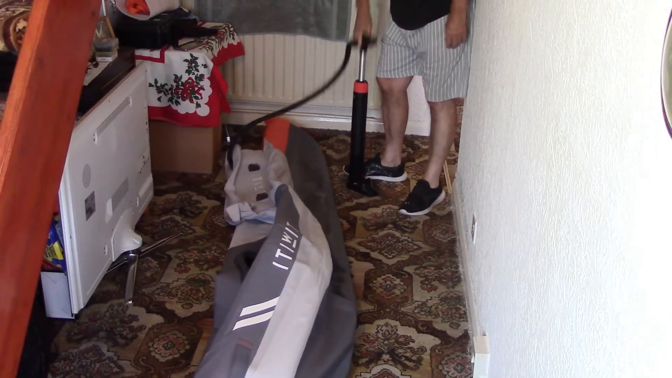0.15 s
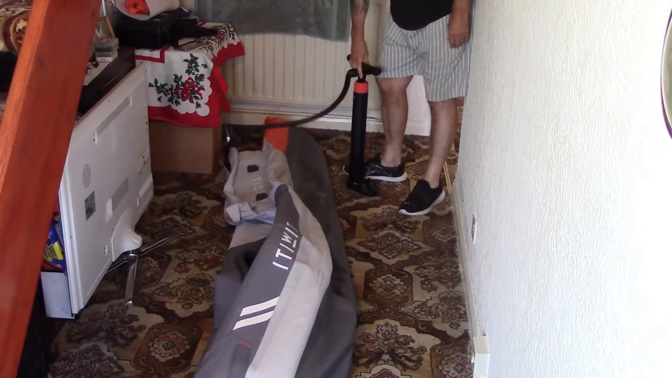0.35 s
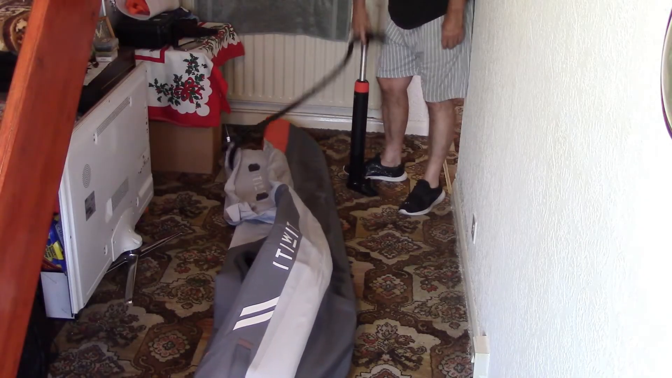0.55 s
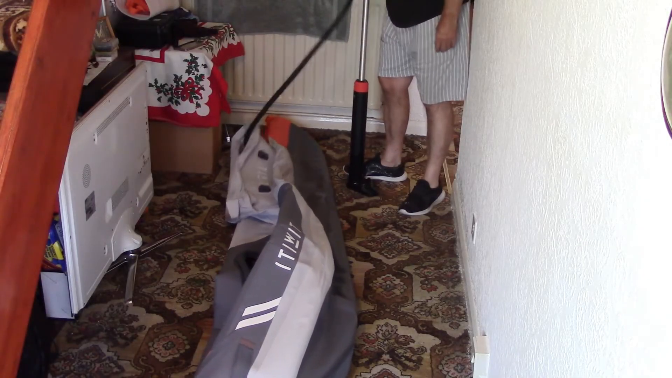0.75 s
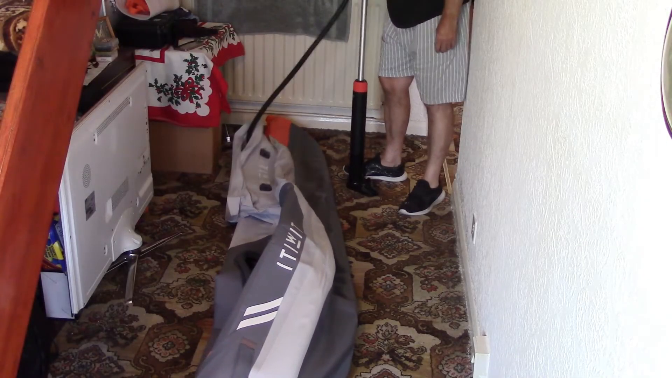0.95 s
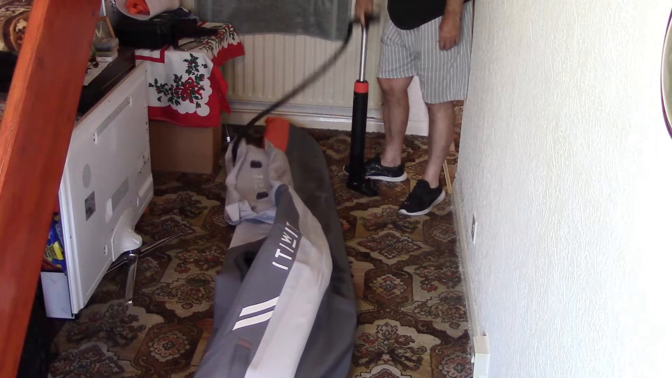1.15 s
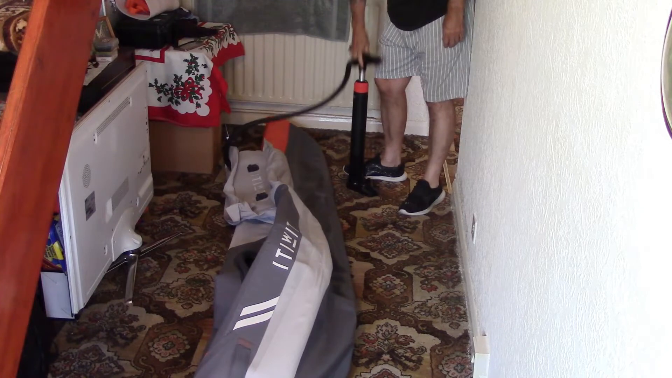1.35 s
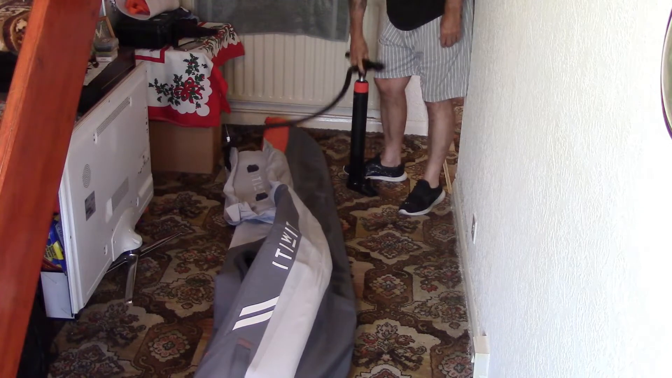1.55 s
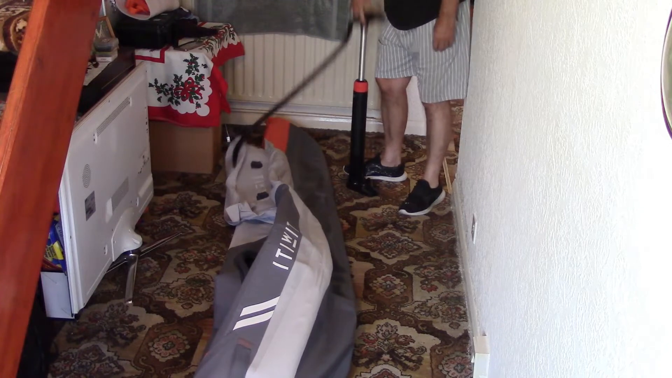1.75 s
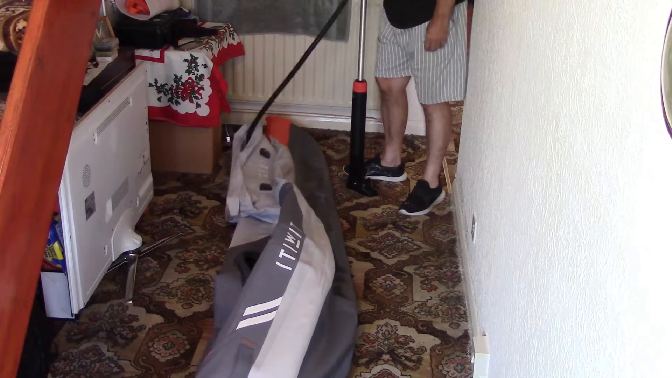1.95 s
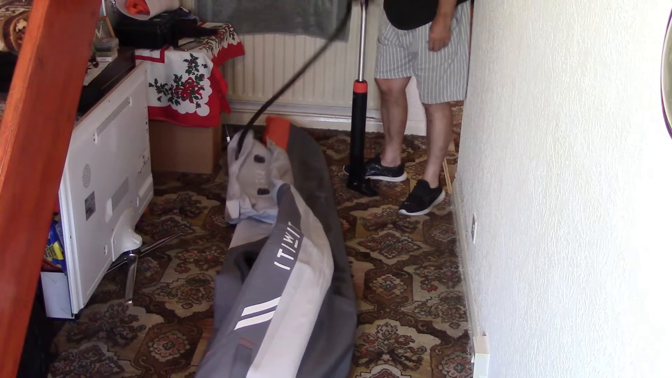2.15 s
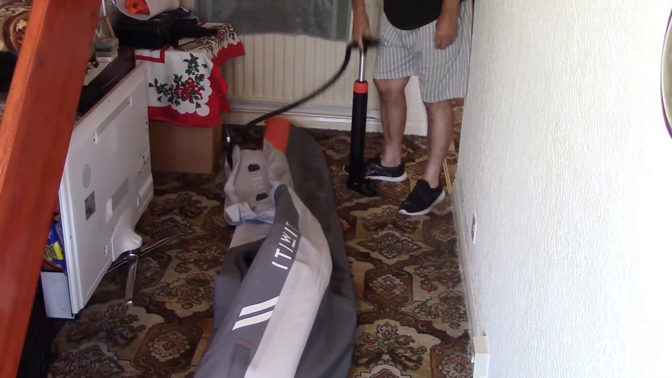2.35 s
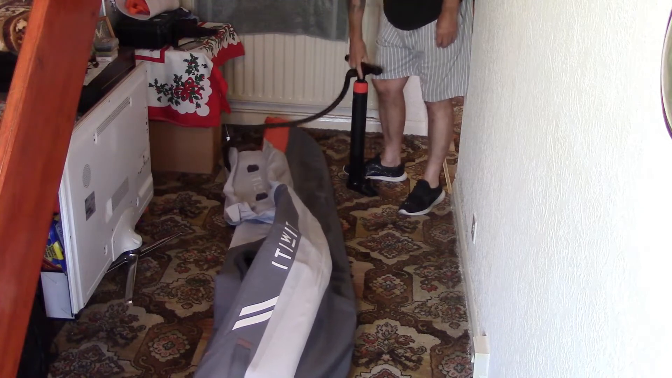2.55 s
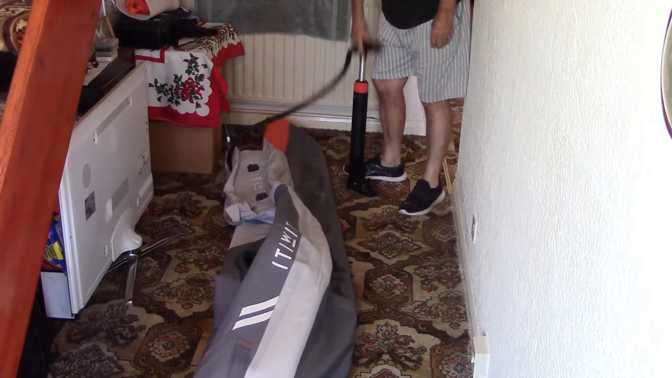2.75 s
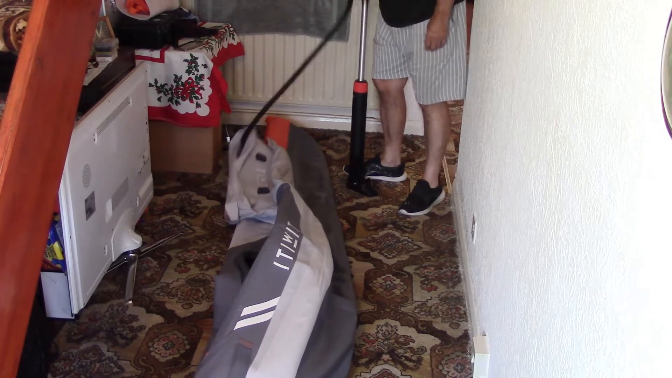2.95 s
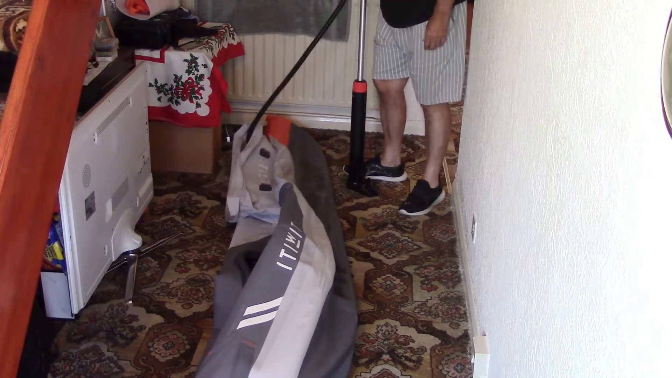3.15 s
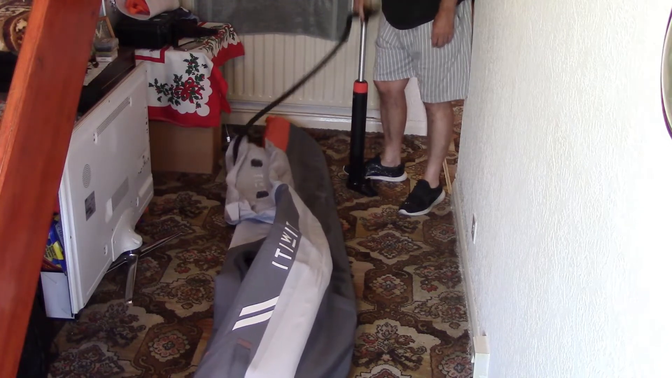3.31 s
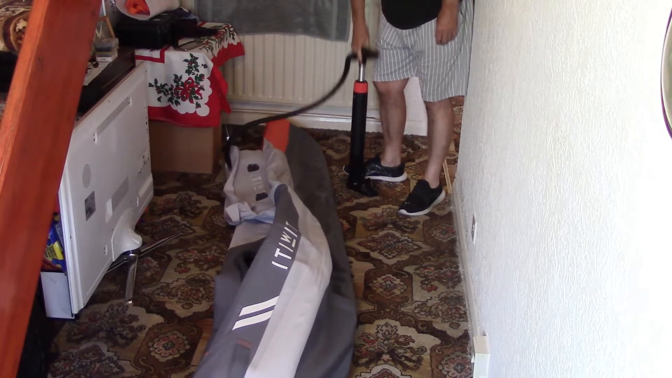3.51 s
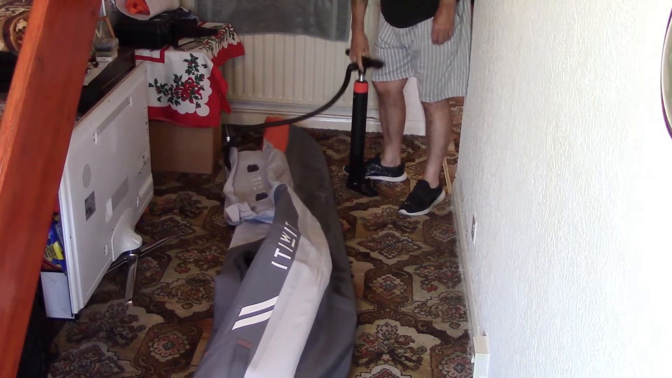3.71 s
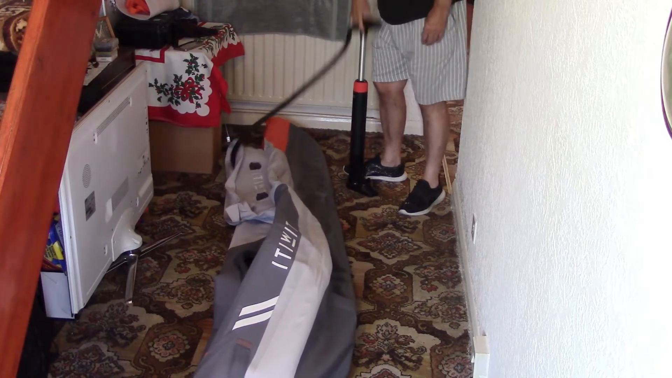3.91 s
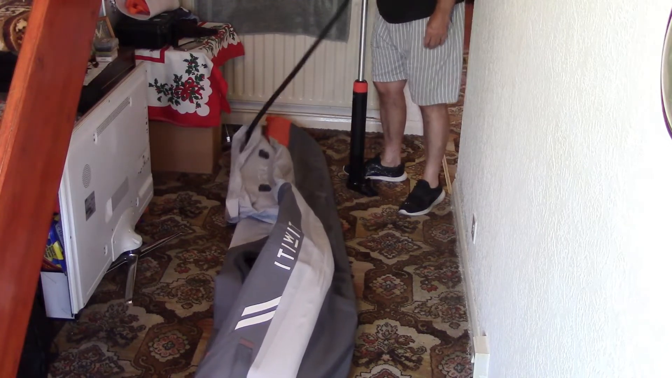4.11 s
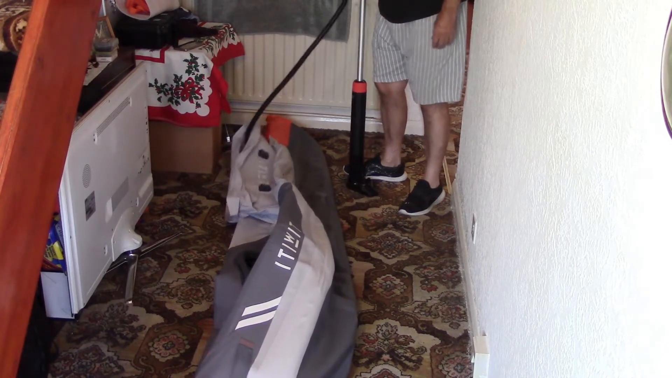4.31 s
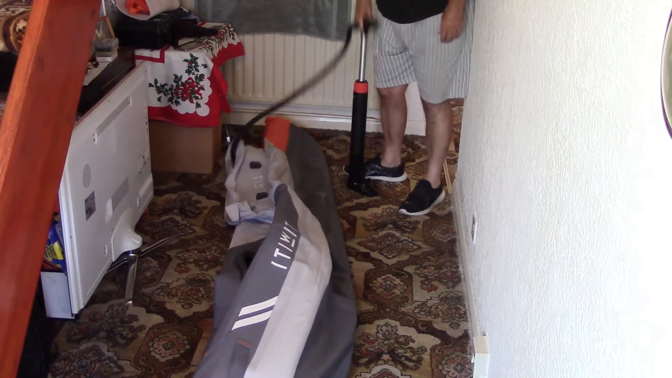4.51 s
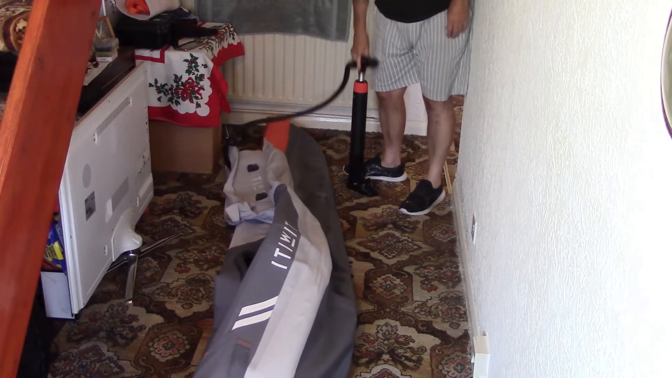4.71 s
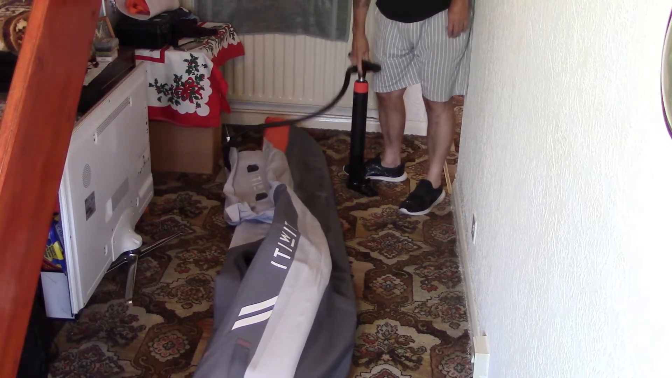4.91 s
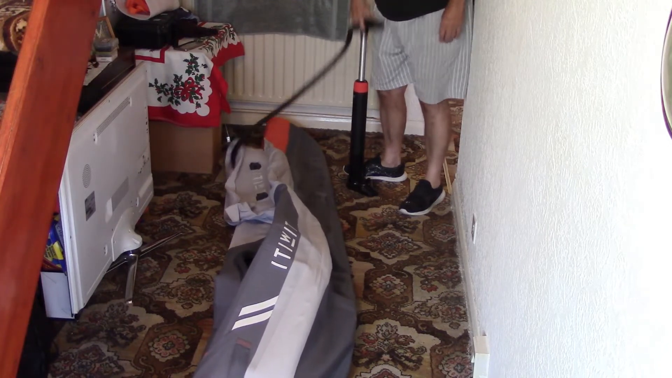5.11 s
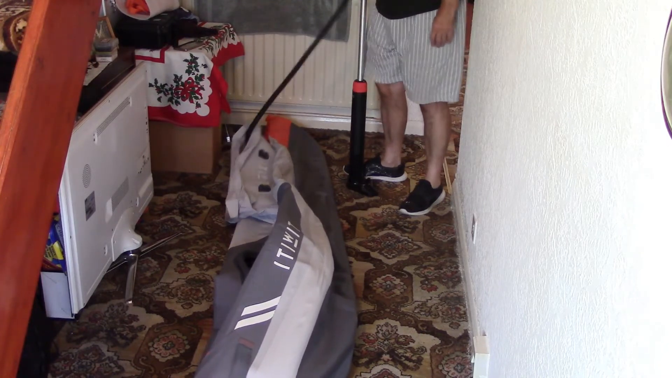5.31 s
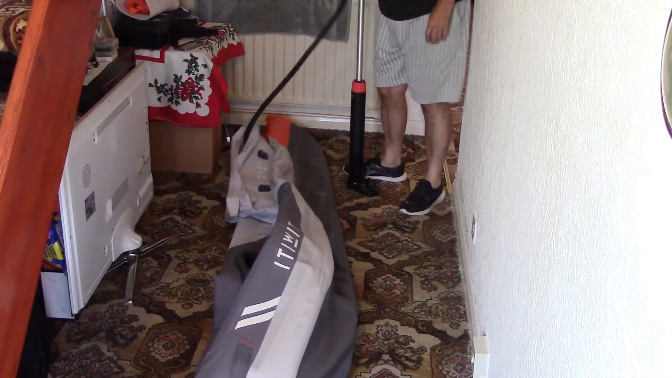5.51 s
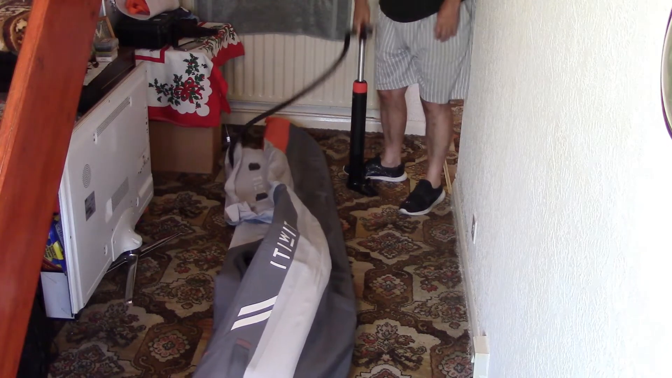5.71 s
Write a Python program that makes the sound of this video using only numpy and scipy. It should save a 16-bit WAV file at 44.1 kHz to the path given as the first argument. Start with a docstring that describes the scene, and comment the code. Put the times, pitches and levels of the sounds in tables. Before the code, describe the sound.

A stand-up pump works without pause in a narrow carpeted room. The sound begins mid-push, then pulls and pushes alternate to the end. Pushes give a longer hissing rush that weakens and wavers; pulls give a rougher, raspier draw of air, often stopped by a hard clunk with clatter and a tick. Small bumps, hose slaps and thin whistles fall between. Faint steady room noise lies underneath, and the small microphone distorts on the hardest knocks.

```python
"""A small microphone in a narrow carpeted room, while a double-action hand pump is worked.
The take opens within a push; pull and push then alternate to its end, eleven strokes in all. Air, made of
shaped noise, rushes, rasps and hisses both ways, with brief whistles. Most strokes end in a knock of the
piston, short sine bursts with clatter and tick, hardest at the top, where it overloads the input.
After each knock the room rings on its low modes and the far walls answer 33 and 41 ms later."""
import sys
import numpy as np
from scipy import signal
from scipy.fft import rfft, irfft
from scipy.io import wavfile
from scipy.ndimage import uniform_filter1d

SR = 44100
rng = np.random.default_rng(int(sys.argv[2]) if len(sys.argv) > 2 else 0)


def put_to_file(sound):
    """Save the sound as 16-bit audio at rate SR, in the file named by the first command-line argument."""
    columns = np.atleast_2d(sound).T  # one column per channel
    safe = np.clip(columns, -1, 1)
    whole_steps = np.round(safe * 32767)
    wavfile.write(sys.argv[1], SR, whole_steps.astype(np.int16))


N = 258514  # length in samples
HOP = 128  # samples between short-time noise spectra

# Strokes of the pump, push and pull in turn. Each row: start in seconds, valve opens in seconds,
# fastest in seconds, stop in seconds, rush level in dB, rasp level in dB, hiss level in dB,
# slowing toward the stop in dB.
STROKES = [(-.25, -.24, 0.053, .27, -28.5, -33.5, -33, -11), (.35, .37, 0.58, 0.78, -28, -29, -39, -4),
           (.845, .85, 1.2, 1.392, -29.5, -33.5, -34.5, -14.5),
           (1.475, 1.52, 1.744, 1.906, -27.5, -29.5, -37.5, -6),
           (1.96, 1.965, 2.144, 2.6, -28.5, -35, -36, -12), (2.58, 2.62, 2.88, 3.017, -28, -29, -39, -6.5),
           (3.07, 3.075, 3.36, 3.745, -30, -35.5, -36.5, -23.5),
           (3.7, 3.73, 3.93, 4.14, -27.5, -30, -39.5, -4),
           (4.24, 4.245, 4.5, 4.79, -30.5, -36.5, -36, -9.5), (4.86, 4.94, 5.04, 5.35, -29, -30, -38.5, -4),
           (5.43, 5.435, 5.69, 5.866, -28.5, -32.5, -34.5, -8)]
# How rush, rasp and hiss (one row each) follow a push or a pull. Each row: delay in seconds,
# rise time constant in seconds, level at the start relative to full speed in dB,
# share of the slowing as a factor, lateness of the slowing as an exponent, release in dB per second.
PUSH_LAWS = [(0.016, 0.032, 1, 1.4, 3.06, -400), (.005, .02, -23, 1.3, 1.75, -280),
             (.001, 0.0087, -6.5, 1.42, 1.4, -500)]
PULL_LAWS = [(0.01, 0.045, 1, .3, 1.3, -350), (0.0089, 0.068, -8.5, 1.9, 1.6, -300),
             (.001, 0.032, -2.5, .9, 1.6, -600)]
# Colours of the air, with the rush different each way. Each row: frequency in Hz, relative density in dB per Hz.
RUSH_PUSH = [(60, -26), (170, -20.5), (350, -2), (475, 0.5), (546, -13), (690, 3.5), (830, -3), (1000, 1),
             (1700, -1.5), (2300, -17.5), (4000, -43)]
RUSH_PULL = [(60, -70), (200, -32), (360, -5), (475, -8), (525, -12), (600, 0.5), (1000, -1.5), (1240, 4),
             (1900, -4), (2400, -8.5), (4000, -37)]
RASP = [(1200, -47), (1900, 2.5), (2400, 0.5), (3400, 2.5), (5000, -3.5), (6900, -11), (9000, -13.5),
        (15500, -40)]
# The valve duct passes its first cross mode only above a sharp cut-on, fainter on the pull.
# Each row: frequency in Hz, relative density in dB per Hz.
HISS_PUSH = [(6000, -11.5), (7150, -12.5), (7350, 2), (7800, -2.5), (8600, -2), (10000, -13), (12600, -19),
             (14500, -34), (15600, -44)]
HISS_PULL = [(6000, -13.5), (7150, -5), (7350, 5), (7800, 0.5), (8600, -2), (10000, -10), (12600, -14.5),
             (14500, -34), (15600, -44)]
# Brief wavers of the flow. Each row: centre in seconds, half width in seconds,
# change of rush in dB, change of rasp in dB, change of hiss in dB.
WAVERS = [(.11, 0.041, -11, -4, -6.5), (.185, 0.05, 3.5, 4, -1.5), (.255, .015, -3, -2, -9),
          (1.07, .03, -4, -6.5, -2.5), (1.2, 0.039, -6.5, -2.5, -4.5), (1.34, .03, -4.5, -3, -1),
          (2.33, 0.047, -5, -3.5, 0), (2.445, 0.014, -10, -8, -5), (2.555, 0.038, -3, -3, -14.5),
          (3.55, 0.034, 1.5, -3, 0.5), (3.61, 0.026, -7, -16, 8.5), (3.67, 0.022, -15, -6, 11),
          (4.65, 0.025, -7, -4, -3), (4.735, 0.022, -10, -8, -8), (4.8, 0.029, 16, 5, 0),
          (4.94, 0.044, -4, -7, -5), (5.11, 0.027, 0, -2.5, -8), (5.17, .03, -2.5, -7.5, -.5),
          (5.58, .03, -2, -5, -1.5)]
# near full speed the hiss brightens: dB per octave above the cut-on, half width in s, cut-on in Hz
BRIGHTEN_DB, BRIGHTEN_S, CUT_ON_HZ = 2.5, 0.085, 7150


def flow_power(t, hz):
    """Mean power of the turbulence, bins x frames: rush, rasp and hiss of all strokes add as powers."""
    power = 0
    changes_db = sum(np.outer(db, np.exp(-((t - at) / width) ** 2)) for at, width, *db in WAVERS)
    rush_waver, rasp_waver, hiss_waver = gain_of(changes_db)
    octaves = np.log2(np.maximum(hz / CUT_ON_HZ, 1))
    for k, stroke in enumerate(STROKES):
        pulling = k % 2 == 1
        laws = PULL_LAWS if pulling else PUSH_LAWS
        rush = RUSH_PULL if pulling else RUSH_PUSH
        hiss = HISS_PULL if pulling else HISS_PUSH
        start, valve, fastest = stroke[:3]
        near_full_speed = np.exp(-((t - fastest) / BRIGHTEN_S) ** 2)
        bright = gain_of(BRIGHTEN_DB * np.outer(octaves, near_full_speed))
        # the hiss waits for the valve
        layers = [(rush, start, rush_waver), (RASP, start, rasp_waver), (hiss, valve, hiss_waver * bright)]
        for level_db, law, (points, opens, waver) in zip(stroke[4:], laws, layers):
            magnitude = waver * follow(t, opens, stroke, level_db, law) * colour(points, hz)
            power = power + magnitude ** 2
    return power


def follow(t, opens, stroke, level_db, law):
    """Gain of one layer: it opens, swells to full speed, sinks as the piston slows, and dies after the stop."""
    start, _, fastest, stop, *_, slowing_db = stroke
    delay, rise, early_db, share, lateness, release = law
    opened = (1 - np.exp(-np.maximum(t - opens - delay, 0) / rise)) ** 2
    early = np.clip((fastest - t) / (fastest - start), 0, 1) ** 2
    late = np.clip((t - fastest) / (stop - fastest), 0, 1) ** lateness
    after_stop = np.maximum(t - stop, 0)
    return opened * gain_of(level_db + early_db * early + share * slowing_db * late + release * after_stop)


# Jumps of the flow when a fold of the fabric opens. Each row: time in seconds, jump in dB,
# decay time constant in seconds.
SURGES = [(1.086, 8.5, 0.016), (2.19, 3.5, 0.018), (2.875, 2, .04), (4.489, 3.5, 0.027),
          (5.209, 0.5, 0.037)]


def air(patchy_db=1.5, flicker_db=0.78, streak_db=2.0):
    """Turbulence of the pump, its noise randomly uneven: patches, thin streaks, a flicker all frequencies share."""
    t = np.arange(N // HOP + 5) * HOP / SR
    hz = np.fft.rfftfreq(4 * HOP, 1 / SR)
    power = flow_power(t, hz)
    bins_by_frames = power.shape
    patches = uniform_filter1d(rng.standard_normal(bins_by_frames), size=5, axis=0)
    patches = evened(uniform_filter1d(patches, size=12, axis=1))
    flicker = evened(uniform_filter1d(rng.standard_normal(len(t)), size=4))
    streaks = evened(uniform_filter1d(rng.standard_normal(bins_by_frames), size=24, axis=1))
    surge_db = sum(db * (t > at) * np.exp(-abs(t - at) / decay) for at, db, decay in SURGES)
    uneven_db = surge_db + patchy_db * patches + flicker_db * flicker + streak_db * streaks
    return noise_from(np.sqrt(power) * gain_of(uneven_db))


# Brief whistles of seal and valve. Each row: start in seconds, length in seconds,
# frequency in Hz, level in dB before the swell.
WHISTLES = [(.14, 0.058, 1583, -30), (0.37, 0.013, 2150, -37), (0.393, .04, 3080, -44),
            (0.528, 0.015, 1330, -21), (0.612, .055, 6800, -37), (1.505, 0.037, 3050, -47),
            (1.637, .025, 5270, -33), (1.76, .02, 6500, -36), (2.616, 0.086, 3050, -39),
            (2.682, 0.067, 3380, -36), (2.77, .03, 5950, -37), (2.788, 0.047, 6270, -38),
            (3.69, .016, 2160, -44), (3.948, .045, 5200, -36), (4.04, 0.044, 1235, -27),
            (5.132, 0.033, 6000, -35), (5.172, .032, 5860, -41), (5.194, .039, 6300, -36)]
WHISTLE_Q = 48


def whistles():
    """Noise through a narrow resonance, under a short swell."""
    out = np.zeros(N)
    t = np.arange(round(.12 * SR)) / SR
    for s, length, hz, db in WHISTLES:
        pole = np.exp(-np.pi * hz / WHISTLE_Q / SR)
        complex_noise = rng.standard_normal((len(t), 2)) @ [1, 1j]
        slow = signal.lfilter([1], [1, -pole], complex_noise)
        tone = evened((slow * np.exp(2j * np.pi * hz * t)).real)  # slow noise shifted up to pitch
        swell = np.sin(np.pi * np.clip(t / length, 0, 1))
        add(out, s, gain_of(db) * swell * tone)
    return out


# Colour of the bright tick. Each row: frequency in Hz, relative density in dB per Hz.
TICK = [(500, 0.5), (1000, 0), (2100, -16), (3500, -2), (4800, -3), (6000, -16), (12000, -25), (15000, -45)]
FLOOR_HZ = 119


def knocks():
    """A soft thud, the barrel's longer rebound, a clatter of loose parts, a push on the floor and a bright tick."""
    thuds, ticks = np.zeros(N), np.zeros(N)
    t = np.arange(round(.08 * SR)) / SR
    hz = np.fft.rfftfreq(len(t), 1 / SR)
    clatter_colour = hz ** 2 / (1 + (hz / 670.0) ** 5)
    tick_colour = gain_of(read(TICK, hz))
    for row in blows_struck():
        s, db, thud_hz, ms, rebound_hz, rebound_db, clatter_db, tick_db, tick_ms, floor_db = row
        clatter_noise, tick_noise = rng.standard_normal((2, len(t)))
        thud = burst(t, thud_hz, ms)
        rebound = gain_of(rebound_db) * burst(t - 0.8375 * ms / 1000, rebound_hz, 19.9)
        clatter = evened(irfft(rfft(clatter_noise) * clatter_colour, len(t)))
        clatter *= (1 - np.exp(-t / 0.0037)) * np.exp(-t / 0.017)
        floor = gain_of(floor_db) * burst(t, FLOOR_HZ, 9.9)
        add(thuds, s, gain_of(db) * (thud + rebound + floor + gain_of(clatter_db) * clatter))
        tick = evened(irfft(rfft(tick_noise) * tick_colour, len(t)))
        tick *= (1 - np.exp(-t / 0.0016)) * np.exp(-t * 1000 / tick_ms)
        add(ticks, s, gain_of(db + tick_db) * tick)
    return thuds, ticks


def burst(t, hz, ms):
    """A few cycles under a smooth contact force."""
    contact = np.sin(np.pi * np.clip(t * 1000 / ms, 0, 1)) ** 2
    return contact * np.sin(2 * np.pi * hz * t)


# Piston on its top and bottom stop. Each row: time in seconds, blow level in dB before the mix, then
# relative to the blow: rebound in dB, clatter in dB, tick in dB, push on the floor in dB.
TOP_STOPS = [(.7573, 4.5, -6, -6, -18, -17), (2.993, 2.2, -11, -10.5, -20, -38),
             (4.135, 5, -7, -8.5, -15, -37), (5.333, 4.5, -7, -7.5, -15.5, -21)]
BOTTOM_STOPS = [(.2754, -3.5, -14, -17, -15, -11.5), (1.3862, -4, -15, -10.5, -19, -12.5),
                (2.498, -9, -12, -7, -19, -11.5), (4.781, -9, -8.5, -7, -18, -12.5)]
# Nature of each stop, in one row: thud in Hz, contact in ms, rebound in Hz, tick decay in ms.
TOP = (284, 11.55, 387.7, 2.3)
BOTTOM = (289.5, 16.4, 454, 3.1)
# Dull bumps of barrel and hose, and lighter slaps of the hose. Each row: time in seconds,
# blow level in dB before the mix, thud in Hz, clatter in dB and tick in dB relative to the blow.
BUMPS = [(.372, -38, 328, -10, -9), (1.998, -15, 400, -8, -22), (2.609, -22, 393, -13, -17),
         (2.868, -20, 395, -28, -17), (3.119, -17, 396, -6, -23), (3.677, -19, 330, -11.5, -26),
         (3.7, -20, 399, -10, -26), (4.01, -16, 420, -23, -25), (4.751, -23.5, 341, 5, -26),
         (4.906, -25, 399, -13, -13), (5.209, -18, 417, -3, -12)]
SLAPS = [(1.0895, -13.5, 913, -10, -16), (1.984, -23.5, 608, -3, -15), (2.195, -29, 990, -19, -14),
         (2.378, -18.5, 628, -28, -26), (2.462, -28, 627, -19, -9), (2.507, -21, 580, 0.5, -8),
         (3.596, -27, 676, -8, 0.5), (4.489, -17, 686, -19, -13)]
# Nature of bumps and of slaps, in one row: contact in cycles, rebound pitch as a ratio to the thud,
# rebound in dB, tick decay in ms, push on the floor in dB.
BUMP = (5.5, 1.15, -3.5, 3, -15)
SLAP = (4, 1.05, -7, 6.5, -45)


def blows_struck():
    """Every blow with the properties of its kind: stops of fixed pitch, bumps and slaps each of their own."""
    rows = []
    for table, (hz, ms, rebound_hz, tick_ms) in ((TOP_STOPS, TOP), (BOTTOM_STOPS, BOTTOM)):
        for s, db, rebound_db, clatter_db, tick_db, floor_db in table:
            rows.append((s, db, hz, ms, rebound_hz, rebound_db, clatter_db, tick_db, tick_ms, floor_db))
    for table, (cycles, ratio, rebound_db, tick_ms, floor_db) in ((BUMPS, BUMP), (SLAPS, SLAP)):
        for s, db, hz, clatter_db, tick_db in table:
            ms = 1000 * cycles / hz
            rows.append((s, db, hz, ms, ratio * hz, rebound_db, clatter_db, tick_db, tick_ms, floor_db))
    return rows


# Returns from the two far walls, one value per wall: delay in seconds; level relative to the thud in dB.
ECHO_S = [.0325, .041]
ECHO_DB = [1.5, -5.0]
ECHO_TOP_HZ = 335


def far_walls(thuds):
    """Two delayed copies of each blow, duller than the blow itself."""
    echoes = sum(gain_of(db) * np.pad(thuds, (round(s * SR), 0))[:N] for s, db in zip(ECHO_S, ECHO_DB))
    return signal.sosfilt(signal.butter(2, ECHO_TOP_HZ, fs=SR, output="sos"), echoes)


# Low modes of the room. Each row: frequency in Hz, relative level in dB, time to fall 60 dB in seconds.
ROOM_MODES = [(126.8, -6, 0.43), (156, -14, 0.29), (174.2, -2.5, 0.44), (223.7, -6, 0.43), (246, -6.5, 0.3),
              (272, -5.5, 0.11), (308.7, -1.5, 0.099), (348, -1.5, 0.25), (373, -5.5, 0.28),
              (399, -9.5, 0.31), (439, -7, 0.28), (464, -7, .15), (492, -1, 0.17), (573, -24, .2),
              (590, -6, 0.33), (598, -2, 0.15), (666, -3, 0.16), (707, -9, 0.11), (722, -18, .15),
              (785, -17.5, 0.099), (876, 0, .18), (887, -23, 0.11), (950, -17, 0.12), (1002, -5, .16),
              (1140, -26, 0.093), (1210, -12, .16)]


def room_modes(x):
    """Each blow starts all low modes together; they beat as they die."""
    t = np.arange(SR // 2) / SR
    ring = sum(gain_of(db - 60 * t / t60) * np.cos(2 * np.pi * hz * t) for hz, db, t60 in ROOM_MODES)
    return signal.oaconvolve(x, ring)[:N]


# Decay of the reflections. Each row: frequency in Hz, time to fall 60 dB in seconds.
ROOM_T60 = [(200, 0.63), (800, 0.34), (2000, 0.18), (5000, 0.12), (12000, 0.14)]


def room_tail(x):
    """Sparse reflections of random sign, each band dying at its own speed."""
    taps = np.zeros(SR // 2)
    at = np.arange(100, len(taps) - 20, 20)  # one reflection in every 20 samples
    taps[at + rng.integers(0, 20, len(at))] = rng.choice([-1., 1.], len(at))
    hz, t, spectra = signal.stft(taps, SR, nperseg=256)
    decay = gain_of(-60 * t / read(ROOM_T60, hz)[:, None])
    tail = signal.istft(spectra * decay, SR, nperseg=256)[1]
    return signal.oaconvolve(x, tail / np.linalg.norm(tail))[:N]


# Colour of the room tone. Each row: frequency in Hz, relative density in dB per Hz.
QUIET = [(25, -52.5), (60, -15), (160, -3.5), (300, 8), (1000, 3), (4000, -8), (15000, -28)]
QUIET_DB = -43


def room_tone():
    """Steady faint noise of room and preamplifier."""
    hz = np.fft.rfftfreq(4 * HOP, 1 / SR)
    return gain_of(QUIET_DB) * noise_from(colour(QUIET, hz) * np.ones(N // HOP + 5))


def noise_from(magnitude):
    """Noise from random short-time spectra under a bins x frames magnitude."""
    a, b = rng.standard_normal((2, *magnitude.shape))
    noise = signal.istft((a + 1j * b) * magnitude, nperseg=4 * HOP, noverlap=3 * HOP)[1][:N]
    return noise / np.sqrt(HOP * 4 / 3)


def colour(points, hz):
    """Gains of a spectrum whose noise has unit power."""
    return evened(gain_of(read(points, hz)))[:, None]


def read(points, hz):
    """Reads a spectrum on a log-frequency axis."""
    f, value = np.transpose(points)
    return np.interp(np.log(hz + 1), np.log(f + 1), value)


def evened(x):
    """Scales to rms 1."""
    return x / np.sqrt(np.mean(x ** 2) + 1e-20)


def gain_of(db):
    """dB to gain."""
    return 10 ** (np.asarray(db) / 20)


def add(mix, s, sound):
    """Mixes a sound in at time s."""
    part = mix[round(s * SR):][:len(sound)]
    part += sound[:len(part)]


def scene():
    """Pump and room in one channel."""
    flow = air() + whistles()
    thuds, ticks = knocks()
    blows = gain_of(-5.5) * (thuds + far_walls(thuds)) + gain_of(-52.5) * room_modes(thuds)
    # below a few hundred hertz the room answers with its modes, above with dense reflections
    upper = signal.sosfilt(signal.butter(2, 450, "high", fs=SR, output="sos"), blows)
    wet = gain_of(-7.5) * room_tail(flow) + gain_of(-0.5) * room_tail(ticks) + gain_of(-8.0) * room_tail(upper)
    flow_ring = gain_of(-66.5) * room_modes(flow)
    return (flow + ticks + blows + flow_ring + wet)[None]


BASS_CUT_HZ, EDGE_HZ = 150, 15660  # microphone bass loss, upper band limit


def record(dry, knee=8.1):
    """A small microphone loses the bass, the input overloads at full scale; then the band limit."""
    thin = signal.sosfilt(signal.butter(4, BASS_CUT_HZ, "high", fs=SR, output="sos"), dry) + room_tone()
    clipped = thin / (1 + abs(thin) ** knee) ** (1 / knee)
    coupled = signal.sosfilt(signal.butter(1, 40.0, "high", fs=SR, output="sos"), clipped)  # output coupling
    band_limit = signal.firwin(4095, EDGE_HZ, window=("kaiser", 9), fs=SR)
    return signal.oaconvolve(coupled, band_limit[None], "same")


dry = scene()
out = record(dry)
put_to_file(out)
```